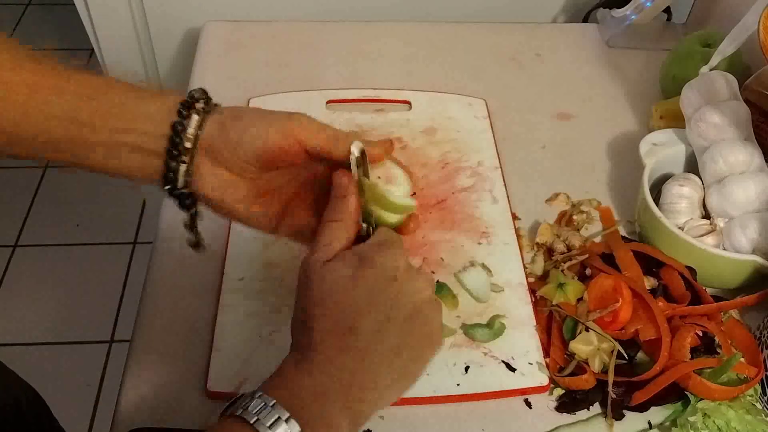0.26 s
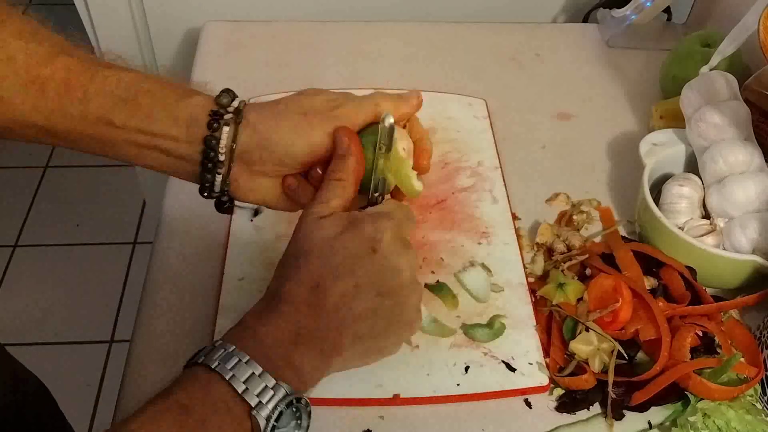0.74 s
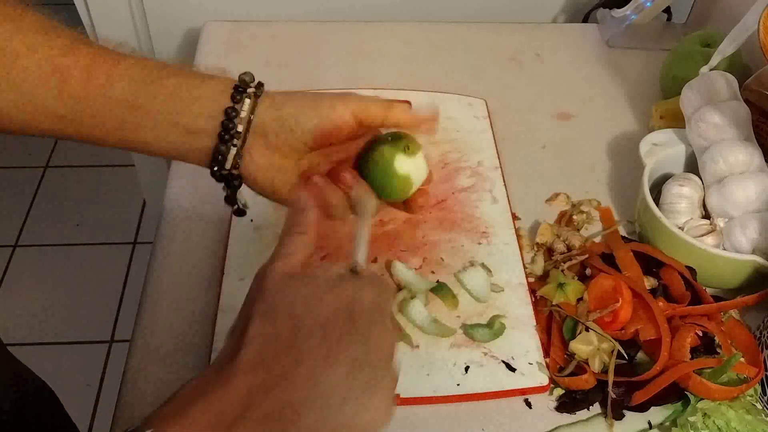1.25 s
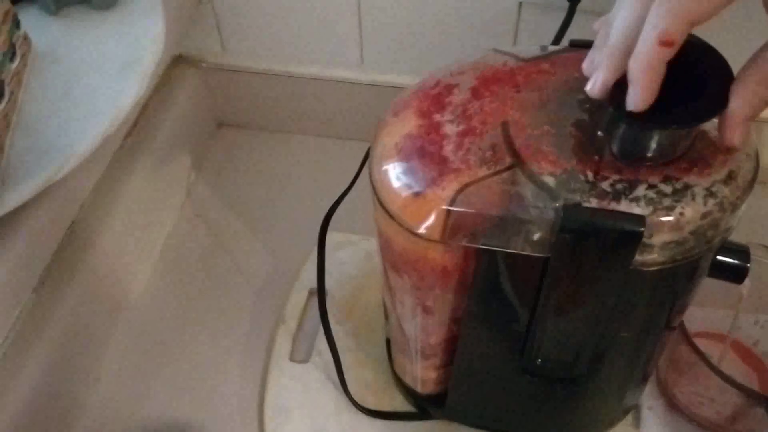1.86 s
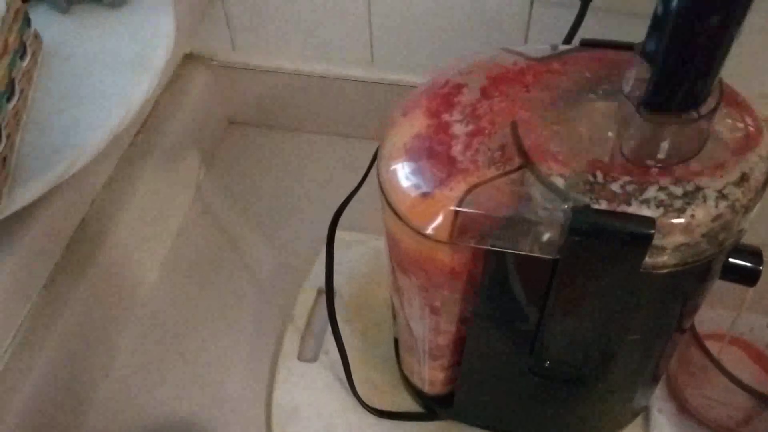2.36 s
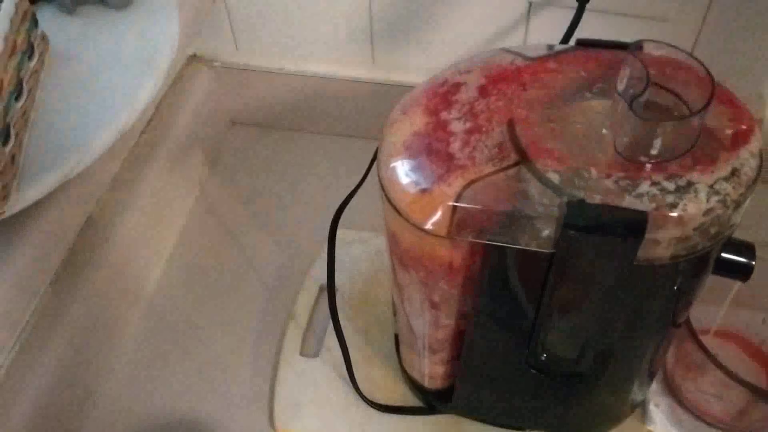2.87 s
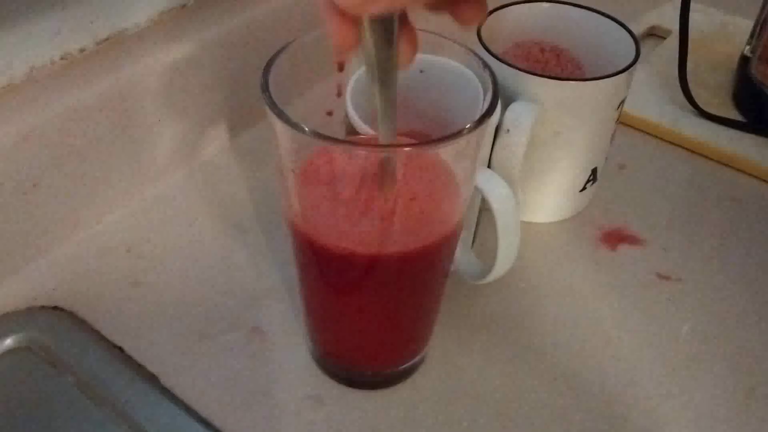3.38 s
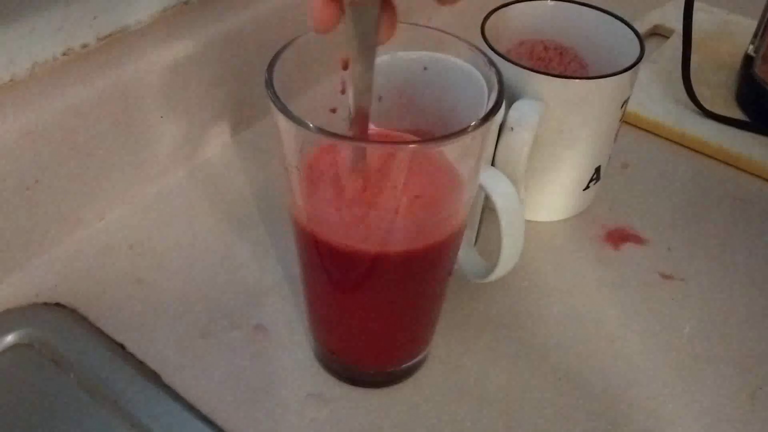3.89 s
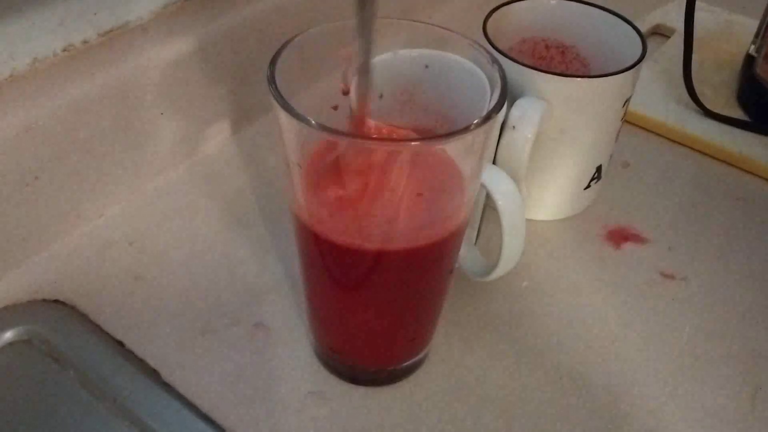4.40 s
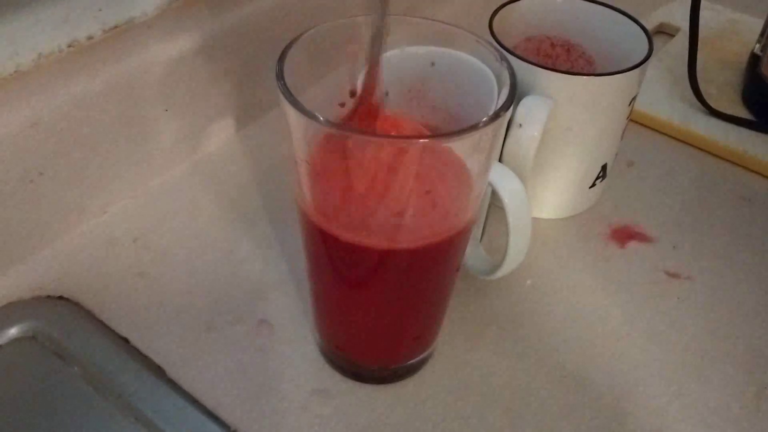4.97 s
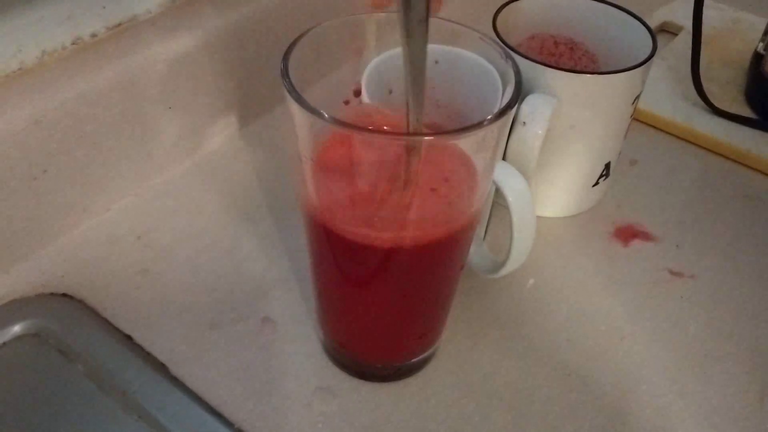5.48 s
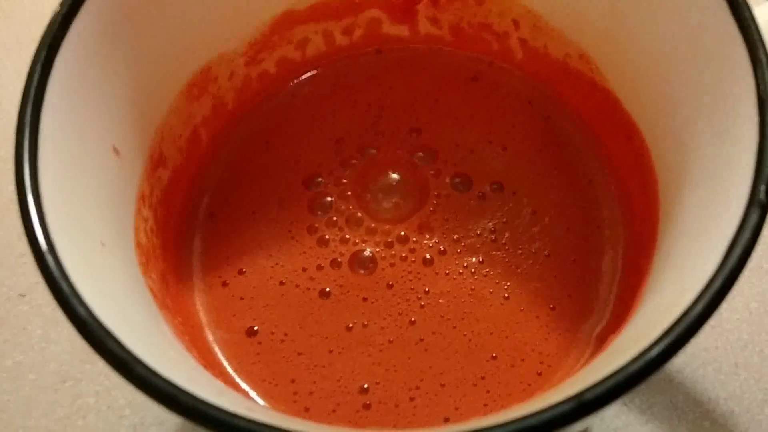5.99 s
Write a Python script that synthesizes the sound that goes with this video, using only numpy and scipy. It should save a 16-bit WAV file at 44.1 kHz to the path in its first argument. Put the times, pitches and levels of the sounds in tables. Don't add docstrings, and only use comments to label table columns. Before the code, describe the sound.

Harsh juicer motor drone with grinding and a sagging pitch, a second close run rising slightly, abrupt mute gap, then spoon clinks against glass.

```python
import sys
import numpy as np
from scipy import signal
from scipy.fft import rfft, irfft, next_fast_len
from scipy.io import wavfile
from scipy.ndimage import uniform_filter1d

SR = 44100
rng = np.random.default_rng(int(sys.argv[2]) if len(sys.argv) > 2 else 0)


def transcribe(u):
    v = np.clip(np.atleast_2d(u).T, -1, 1)
    q = np.round(v * 32767).astype(np.int16)
    wavfile.write(sys.argv[1], SR, q)


def to_linear_factor(level_db):
    exponent = np.asarray(level_db, float) / 20
    return 10 ** exponent


N = 275360

# time_s, shaft_hz, fruit_load (0-1), fan_whistle_db, commutator_whine_db
SPIN = [
    [(0.0, 211, .05, -2, -3), (0.2, 211.5, 0, -1, 3), (0.285, 213, .1, 8, 1), (0.392, 213.6, .15, 7, 3)],
    [(0.392, 211, .2, 12, -2), (0.47, 210.6, .33, 2, 5.5), (0.63, 209.8, .35, 1, 1),
     (0.78, 208.5, -.05, -3, 5), (0.96, 204.6, -.15, 5, 3), (1.07, 196.3, .05, 9, -6),
     (1.105, 192.7, 1.03, 1, -7), (1.126, 190, 1.03, 0, -8), (1.236, 177.4, .97, -5, -11),
     (1.326, 168, .93, -7, -14), (1.426, 161.8, .8, 0, -16), (1.486, 157, .7, 4, -18)],
    [(1.487, 197.2, .33, -2, -3.5), (1.707, 203.7, .02, 5.5, 1), (1.927, 208.1, .08, 7, -2.5),
     (2.368, 212.7, 0, 3, 2.5), (2.7, 214.4, 0, -1.5, 6.5), (3.02, 215.4, .08, 1, 0),
     (3.14, 213.9, -.1, -2, 8), (3.2472, 213, -.25, -3, 5)],
]
# shaft_multiple, level_db, sideband_above_db, sideband_below_db, left_minus_right_db
IDLE_ORDERS = [(1, -28, -9, -20.5, 14), (2, -38, -5, -16, 7.5), (3, -35, -6, -0.5, -3),
               (4, -29.5, -7.5, -13, -15), (5, -27, -18.5, -32.5, 2), (6, -31, -20.5, -7.5, 1),
               (7, -41, -10, -13.5, -2), (9, -37, -12, -9.5, 5), (11, -31.5, -11, -15, -18),
               (12, -24, -5, -17, 3), (24, -36, -17, -13, -5.5)]
GRATE_ORDERS = [(1, -30, -13, -31, 8.5), (2, -36, -17, -21, 13), (3, -37.5, -1, -2.5, -3.5),
                (4, -36.5, -11, -16, 2.5), (5, -35, -6, -12, -1.5), (6, -34.5, -11, -1.5, 1),
                (7, -54.5, -12, -13.5, 2), (9, -40.5, -15.5, -14, 2), (11, -41.5, -12, -14, 5.5),
                (12, -27, -3.5, -18.5, 0.5), (24, -33, -14, -13, -1.5), (35, -40.5, -12.5, -12.5, 5.5),
                (34, -41, -13, -10.5, 1)]
CLOSE_ORDERS = [(1, -14, -13.5, -33, 1.5), (2, -27, -10.5, -11, 9), (3, -32, -16, -14, 0.5),
                (4, -34, -7, -6.5, 0.5), (5, -29, -11.5, -12.5, -4), (6, -34, -18.5, -1.5, -5),
                (7, -38.5, -11.5, -15, -5), (9, -39, -12, -13.5, -4), (11, -33, -13, -13.5, -7),
                (12, -23, -8.5, -12.5, 5), (24, -33, -10, -10, 3.5)]
ORDERS = [IDLE_ORDERS, GRATE_ORDERS, CLOSE_ORDERS]
# freq_hz, density_db_per_hz
AIR = [
    [(45, -67), (150, -61.5), (280, -56.5), (500, -55), (900, -57), (1400, -56), (1900, -60.5),
     (2500, -57.5), (3300, -63.5), (5000, -66), (8200, -69), (9500, -65.5), (12000, -74), (15500, -71)],
    [(45, -61.5), (150, -61), (280, -55), (500, -55.5), (900, -56.5), (1400, -61), (1900, -61.5),
     (2500, -61), (3300, -63.5), (5000, -66), (8200, -64.5), (9500, -61), (12000, -67.5), (15500, -66)],
    [(45, -80), (150, -50.5), (280, -51), (500, -58), (900, -55.5), (1400, -57), (1900, -58), (2500, -55.5),
     (3300, -60.5), (5000, -64.5), (8200, -64.5), (9500, -63), (12000, -71), (15500, -67)],
]
# pull_rate_db, double_rate_db
HUM = [
    (-38.5, -31),
    (-39.5, -31),
    (-45, -35),
]
# rumble_db, air_rush_db, grater_db
CALM = [
    (-1, 0, .5),
    (-2.5, -1.5, -5.5),
    (-7, 1.2, .2),
]
# centre_s, length_s, unbalance_db, wobble_db, whine_db
SNAG = [(.2, .05, 0, -2, -3), (.3, .05, 4, 0, 0), (.35, .03, 0, 0, -7), (.46, .06, 4, 0, 4),
        (.74, .04, 2, -2, 2), (.86, .05, -2, 0, -5), (1.065, .035, -11, -3, -4), (1.13, .03, -4, 2, 0),
        (1.22, .02, 0, -3, 0), (1.26, .05, 3, 0, -2), (1.4, .04, 0, 2, 0), (1.47, .03, 0, -7, 0),
        (1.62, .07, -1, -4, 0), (2.2, .05, 0, 0, -1), (2.53, .035, 0, 0, -6), (2.85, .08, 0, 0, 3),
        (3.07, .03, -3, 0, 3), (3.1, .03, -4, -1, 2), (3.16, .04, -2, -2, 1.5)]
# centre_s, length_s, level_db
RESEAT = [
    (1.75, .35, -5),
    (2.95, .17, -10),
]
# centre_s, length_s, counter_rumble_db, grater_and_air_db
JOLT = [(.395, .02, 5, 6), (.45, .06, 9, 2), (.7, .025, 0, 3), (1.0, .1, 6, 0), (1.065, .025, -12, 0),
        (1.2, .06, 13, -1.5), (1.39, .08, 3, 1.5), (1.484, .025, 24, 0), (2.13, .04, 10, 1),
        (2.467, .03, 18, 2), (2.785, .05, 9, 1), (2.995, .04, 11, 0), (3.11, .04, 13, 1)]
# start_s, pitch_hz, level_db, t60_s
KNOCK = [(0.396, 1177, -12.5, 0.082), (.406, 1220, -8.5, 0.087), (.435, 1110, -11, .05),
         (.47, 1200, -17, .06), (.5, 1130, -16, .05), (1.02, 1000, -15, 0.09), (1.39, 1345, -19, 0.12),
         (1.55, 1002, -18, 0.13), (2.19, 960, -16, .08), (2.462, 45, -27, .06), (3.095, 1300, -11, 0.067),
         (3.09, 700, -15, 0.053)]
# centre_s, pitch_hz, level_db, length_s
SQUEAL = [(.39, 4680, -32, .025), (.42, 9600, -36, .04), (.92, 9700, -32, .03), (.98, 6950, -33, .04),
          (1.03, 8900, -30, .025), (1.1, 9350, -31, .04), (1.17, 9100, -31, .04), (1.22, 4300, -34, .04),
          (1.25, 10200, -33, .03), (1.32, 9500, -31, .04), (1.41, 9600, -31, .025)]

# freq_hz, left_right_correlation
LIKENESS = [(30, 1), (300, 0.8), (640, 0.17), (1400, 0.15), (3100, 0.088), (7000, .01)]
# freq_hz, left_minus_right_db
TILT = [(60, 0), (110, -1), (200, -3), (380, 2.5), (700, 0.5), (1290, -1), (2380, -0.5), (4400, 5.5),
        (8120, -6), (15000, -3)]

# start_s, peak_db, then relative wall_db, rim_db, bright_db
CLINK = [(3.8936, -33, -13, -25, -29), (3.9031, -19, -8, -26, -33), (3.9412, -31, 2, -20, -25),
         (4.018, -9.5, -8, -11, -37), (4.0794, -11.5, -4, -15, -33), (4.3019, -23, -2, -20, -34),
         (4.3908, -14.5, -3, -5, -22), (4.4712, -13, -3.5, -10, -17), (4.7681, -14, -11, -10, -11),
         (4.8102, -13.5, -10, -8, -9), (4.9172, -25, -12.5, -7, -22), (4.9919, -20.5, -23.5, -19, -26),
         (5.0697, -36, -21, -23, -29), (5.2526, -10.5, -20, -10, -14), (5.3335, -18, -6, -22, -36),
         (5.5454, -12.5, -3, -10, -17), (5.5972, -24, -1, -17, -35), (5.66, -18, -2, -28, -38),
         (5.7217, -27.5, -5, -17, -30), (5.7708, -14, -11, -18, -33), (5.8368, -12.5, -5, -12, -21),
         (5.9348, -29, 3, -15, -35), (5.9953, -32, -3, -17, -30), (6.0066, -35, -6, -18, -30)]
# deep_wall_db, main_wall_db, lowest_spoon_db
TOUCH = [(3, -4, 0), (4, -4, 0), (4, -5, 2), (3, -6, -7), (1, -2, -4), (-4, -2, 0), (-3, 1, -1),
         (-6, -2, 2), (3, -6, 3), (-1, 0, -6), (1, 5, -3), (-3, 0, 8), (1, -1, 2), (0, -5, -4), (-5, -3, 4),
         (1, 0, -1), (0, 1, -9), (2, -8, 9), (6, 2, 0), (6, 1, 7), (8, -2, -3), (-2, 0, -1), (7, -6, 7),
         (5, -6, 10)]
# crack_middle_db, crack_treble_db, top_tick_db
CONTACT = [(0, 3, 4), (0, 3, 5), (5, -1, 4), (-12, 0, -3), (2, 0, -4), (0, 1, 4), (0, -2, -8), (0, -2, -2),
           (0, 6, 5), (0, 0, 3), (-5, -4, 3), (3, 4, 2), (-2, -2, -9), (1, 3, 1), (-1, 4, 4), (-3, 0, -5),
           (0, -2, 9), (-3, 5, 5), (0, -3, -1), (2, 0, -2), (0, -3, -2), (0, 5, 6), (6, 1, -5), (6, 1, -2)]
# middle_wall_db, upper_wall_db, stem_db, tip_db, left_minus_right_db
GRIP = [(1, 0, -8, -4, -2), (1, 0, -9, -5, -2), (4, -1, -5, 2, -2), (0, 0, 2, 0, 0), (2, -3, 2, 0, -2),
        (7, 2, -5, 3, 0), (0, 0, 1, 1, 0), (-6, -2, 4, -8, 1), (-1, 1, -1, -4, 1), (1, 1, 0, -3, 5),
        (-3, -10, 0, 3, -1), (4, -2, -11, 0, 1), (0, -2, 0, -2, 0), (-1, 6, -3, -2, 2), (-4, 0, -4, 4, -1),
        (-8, -1, 0, -5, -1), (-1, -3, -7, 2, -1), (3, 1, -9, 3, -1), (1, -5, -3, -4, 0), (0, -4, 1, 3, 1),
        (4, -2, 6, -1, -1), (0, -2, -1, 0, -3), (-2, -3, 0, 6, -2), (-2, -2, 1, 6, -4)]
FREE = [.7, .6, .9, .8, .9, .5, .8, .9, .8, 1.3, .9, .6, .8, 1, .7, 1.05, 1.3, .5, .9, .8, 1, .8, .7, .7]
# pitch_hz, level_db, t60_s
WALL = [(611, -18, .07), (780, -17.5, 0.12), (1062, -2.5, 0.089), (1203, -7.5, 0.11), (1328, -3.5, 0.076),
        (1438, -7, 0.069), (1560, -11.5, 0.074)]
RIM = [(1856, -2.5, .08), (1910, -4.5, 0.044), (1957, -10, .19), (2100, -8, 0.034)]
BRIGHT = [(4212, -1, 0.04), (4226, -14, 0.24), (7344, -5, 0.065), (11180, -12, 0.073)]
SPOON = [(3076, 0.5, 0.038), (4800, -8, .03), (5307, 2.5, .04), (6140, 0, 0.023)]
# start_s, pitch_hz, level_db, t60_s
THUD = [(5.935, 250, -19, .07), (5.935, 335, -20, .08), (5.947, 300, -20, .05), (5.96, 270, -17, .04),
        (5.936, 1058, -15.5, .16), (5.934, 1290, -18, .04), (5.944, 1085, -22, .1), (5.96, 590, -33, .1),
        (5.977, 290, -25, .05), (5.995, 200, -23, .04), (6.002, 290, -22, .08), (6.001, 1210, -30, .07),
        (6.004, 2950, -38, .04), (3.905, 300, -29, .1), (3.905, 610, -38, .08)]
# freq_hz, density_db_per_hz
CRACK = [(200, -32.5), (900, -15.5), (2070, -11), (2530, -11.5), (3150, -9.5), (3700, -17), (4900, -3.5),
         (7300, -13.5), (8440, -23), (9800, -10.5), (11800, -10), (13000, -22.5), (15700, -28)]
# freq_hz, density_db_per_hz
SLOSH = [(40, -12), (120, 7.5), (300, -2), (600, -15), (1200, -37.5)]

# freq_hz, density_db_per_hz
STIR_HUSH = [(24, -44), (40, -15.5), (108, 4.5), (247, -3), (368, -9.5), (484, -10.5), (637, -14.5),
             (1220, -19), (1640, -26), (15500, -44.5)]
# freq_hz, density_db_per_hz
LAST_HUSH = [(40, -7), (183, -5.5), (310, -5.5), (505, -19.5), (592, -9), (900, -25), (2500, -41.5),
             (9000, -48), (10500, -58), (12000, -62), (15500, -52)]

STIR_S, LAST_S = 3.89, 6.0145
MAINS_HZ = 120
FREE_HZ = 215
JUDDER, CENTRE = .003, .9
UNBALANCE_DB, WOBBLE_DB, LOW_DB = 55, 22.5, 7
BEAT_DB, BEAT_SLIP, BEAT_LOAD_DB = 14, .035, -9
BARS_DB, RUSH_SLIP_DB = -50, -12
BOG_SLIP, BOG_DB, THIRD_DB = .175, -200, 2
RUSH_DB, GRATE_DB, BRAKE_S = 6, 9.5, .15
RATTLE_SHARE = .2
SQUEAL_WIDTH_HZ, SQUEAL_SAG = 520, .1
TICK_DB, TICK_SOFT, TICK_DULL, DULL_DB = -31, .4, .6, -27
SWIRL_HZ, SWIRL_SHARE = 35, .6
ROOM_T60_S, ROOM_DB = 0.2, -4.5
TOP_HZ = 15750


def curve(points, hz):
    p = np.array(points, float)
    return np.interp(np.log(hz + 1), np.log(p[:, 0] + 1), p[:, 1])


def walk(count, rate):
    k = int(SR / rate)
    held = np.repeat(rng.standard_normal(count // k + 1), k)
    return 1.377 * uniform_filter1d(uniform_filter1d(held, k), k)[:count]


def swells(t, events):
    return sum(np.outer(dbs, np.exp(-((t - at) / length) ** 2)) for at, length, *dbs in events)


def add(out, s, sound):
    i = int(s * SR)
    out[..., i:i + sound.shape[-1]] += sound[..., :N - i]


def tint(x, colour):
    cepstrum = irfft(np.log(to_linear_factor(curve(colour, np.arange(1025) * SR / 2048))))
    cepstrum[1:1024] *= 2
    cepstrum[1025:] = 0
    response = irfft(np.exp(rfft(cepstrum)))
    response = response / np.sqrt(np.sum(response ** 2))
    return signal.fftconvolve(x, response[None], axes=1)[:, :x.shape[1]]


def ring(hz, db, t60, push_s):
    t = np.arange(int(.35 * SR)) / SR
    decay = np.exp(-np.log(1000) * t / t60)
    return to_linear_factor(db) * np.sin(2 * np.pi * hz * t) * decay * (1 - np.exp(-t / push_s))


def hiss(count, colour, edges_hz, levels_db, flicker_db, rate):
    size = next_fast_len(count)
    hz = np.arange(size // 2 + 1) * SR / size
    like = np.clip(curve(LIKENESS, hz), 0, 1)
    tilt_db = curve(TILT, hz) / 2
    mid, side = rfft(rng.standard_normal((2, size))) * to_linear_factor(curve(colour, hz)) * np.sqrt(SR / 4)
    mid, side = mid * np.sqrt(1 + like), side * np.sqrt(1 - like)
    both = np.array([(mid + side) * to_linear_factor(tilt_db), (mid - side) * to_linear_factor(-tilt_db)])
    out = 0
    for octave in range(9):
        centre = 40 * 2. ** octave
        share = np.clip(1 - abs(np.log2(np.clip(hz, 40, 10240) / centre)), 0, 1)
        zone_db = levels_db[np.searchsorted(edges_hz, centre)] + flicker_db * walk(count, rate)
        out = out + irfft(both * share, size)[:, :count] * to_linear_factor(zone_db)
    return out


def kitchen(count, colour, db):
    noise = hiss(count, colour, (), (0,), flicker_db=.9, rate=12)
    return noise * to_linear_factor(db) / np.sqrt(np.mean(noise.mean(axis=0) ** 2))


def struck_modes(clink, touch_db, grip_db, free):
    _, peak_db, wall_db, rim_db, bright_db = clink
    out = 0
    groups = ((WALL, wall_db + 1.5, .022), (RIM, rim_db + 2.5, .008),
              (BRIGHT, bright_db + 6.5, .0015), (SPOON, -15, .03))
    for modes, rel_db, spread in groups:
        for hz, db, t60 in modes:
            off, size, left, right = rng.standard_normal(4)
            spot_db = np.dot(touch_db, (hz < 900, 900 < hz < 1130, 2900 < hz < 3300))
            held = (1130 < hz < 1260, 1260 < hz < 1650, 4500 < hz < 5600, 5600 < hz < 6500)
            spot_db += np.dot(grip_db, held)
            level_db = peak_db + rel_db + spot_db + db + 1.6 * size
            mode = ring(hz * (1 + spread * off), level_db, t60 * free, push_s=0.00086)
            throb = np.sin(np.pi * SWIRL_HZ * np.exp(left / 2) * np.arange(len(mode)) / SR) ** 2
            mode = mode * (1 + SWIRL_SHARE / 2 - SWIRL_SHARE * throb)
            out = out + mode * to_linear_factor(3.8 * np.array([[left], [right]]))
    return out


def contact_crack(t, contact_db, stem_db):
    mid_db, treble_db, _ = contact_db
    colour = []
    for hz, db in CRACK:
        meet_db = mid_db * (2200 < hz < 4000) + stem_db * (4500 < hz < 5600) / 2 + treble_db * (6500 < hz)
        colour.append((hz, db + meet_db + 3 * rng.standard_normal()))
    decay = np.exp(-t / 0.0043) + 0.37 * np.exp(-t / 0.0083)
    return tint(rng.standard_normal((2, len(t))) * decay * (1 - np.exp(-t / 0.00039)), colour)


def tiled_room(x):
    t = np.arange(int(.3 * SR)) / SR
    decay = np.exp(-np.log(1000) * t / ROOM_T60_S)
    wash = rng.standard_normal((2, len(t))) * decay * (1 - np.exp(-t / 0.0021))
    wash = wash / np.sqrt(np.sum(wash ** 2, axis=1, keepdims=True))
    return to_linear_factor(ROOM_DB) * signal.fftconvolve(x, wash, axes=1)[:, :N]


def glass():
    direct, ticks, slaps = np.zeros((3, 2, N))
    t = np.arange(int(.12 * SR)) / SR
    for clink, touch_db, contact_db, grip, free in zip(CLINK, TOUCH, CONTACT, GRIP, FREE):
        s, peak_db, _, _, bright_db = clink
        *grip_db, pan_db = grip
        side = to_linear_factor(pan_db / 2 * np.array([[1], [-1]]))
        add(direct, s, side * struck_modes(clink, touch_db, grip_db, free))
        add(direct, s, side * contact_crack(t, contact_db, grip_db[2]) * to_linear_factor(peak_db - 6.5))
        tick_db = contact_db[2] + TICK_DB - TICK_SOFT * peak_db - TICK_DULL * max(bright_db, DULL_DB)
        tick = rng.standard_normal((2, len(t))) * np.exp(-t / .004) * (1 - np.exp(-t / .0008))
        add(ticks, s, tick * to_linear_factor(peak_db + tick_db + 8.5))
        slap = rng.standard_normal(len(t)) * np.exp(-t / 0.027) * (1 - np.exp(-t / .008))
        add(slaps, s, slap * to_linear_factor(0.28 * peak_db - 31.5))
    for s, hz, db, t60 in THUD:
        add(direct, s, ring(hz, db, t60, push_s=0.00038))
    ticks = tint(ticks, [(11500, -36.5), (13500, 3.5), (14800, 1.5)])
    return direct + ticks + tiled_room(direct + .45 * ticks) + tint(slaps, SLOSH)


def grater():
    out = np.zeros((2, N))
    t = np.arange(-int(.1 * SR), int(.1 * SR)) / SR
    for s, hz, db, length in SQUEAL:
        parts = np.array([walk(len(t), rate=SQUEAL_WIDTH_HZ) for _ in range(4)])
        rough = parts[::2] + 1j * parts[1::2]
        tone = np.exp(2j * np.pi * hz * t * (1 - SQUEAL_SAG * t / 2))
        add(out, s + t[0], to_linear_factor(db + 2.5) * np.exp(-(t / length) ** 2) * (rough * tone).real)
    return out


def order_change_db(k, t, slip, load, fan_db, whine_db):
    unbalance_snag, wobble_snag, whine_snag = swells(t, SNAG)
    wobble_db = WOBBLE_DB * load + wobble_snag
    whine_snag = whine_db + whine_snag
    own_db = {1: UNBALANCE_DB * slip + unbalance_snag, 2: wobble_db, 5: fan_db, 12: whine_snag}
    low_mid_high_db = (LOW_DB * load, 0.45 * whine_db, BARS_DB * slip + swells(t, RESEAT)[0])
    change_db = own_db.get(k, low_mid_high_db[np.searchsorted((4, 20), k)])
    if k == 3:
        bogged_db = BOG_DB * np.maximum(slip - 1.2 * BOG_SLIP, 0)
        resonance_db = 7 * np.exp(-((slip - .2) / .015) ** 2)
        change_db = change_db + THIRD_DB * load + bogged_db + resonance_db
    if k == 4:
        change_db = change_db + .3 * np.maximum(wobble_db - 6, 0)
    if k in (4, 6):
        bogged_db = BOG_DB * np.maximum(slip - BOG_SLIP, 0)
        change_db = change_db + bogged_db + (k - 3) * 1.5 * np.maximum(load, 0) ** 2
    return change_db


def motor(spin, orders, hum_db):
    s, *columns = np.transpose(spin)
    t = np.arange(int(s[0] * SR), int(s[-1] * SR)) / SR
    hz, load, fan_db, whine_db = (np.interp(t, s, c) for c in columns)
    slip = np.maximum(1 - hz / FREE_HZ, 0)
    judder = (.0005 + JUDDER * np.maximum(load, 0) ** 2) * walk(len(t), rate=28)
    turn = 2 * np.pi * np.cumsum(hz * (1 + judder)) / SR
    pull = 2 * np.pi * MAINS_HZ * t
    beat_db = BEAT_DB * (np.minimum(slip / BEAT_SLIP, 1) - .5) + BEAT_LOAD_DB * load
    hum = sum(np.sqrt(2) * to_linear_factor(db) * np.sin((k + 1) * pull) for k, db in enumerate(hum_db))
    out = hum * np.ones((2, 1))
    for k, db, up_db, down_db, pan_db in orders:
        k = round(k)
        line_db = db + order_change_db(k, t, slip, load, fan_db, whine_db)
        pan = to_linear_factor(np.outer((pan_db, -pan_db), 1 - CENTRE * load * (k == 1)) / 2)
        pan = pan / np.sqrt(np.mean(pan ** 2, axis=0) / 2)
        for shift, rel_db in ((0, 0), (0.99, up_db + beat_db * (k > 10)), (-1, down_db)):
            apart = min(.13 * k, .7) * (-1) ** k + min(.04 * k, .15) * walk(len(t), rate=6)
            phase = rng.uniform(0, 2 * np.pi) + apart * np.array([[1], [-1]])
            waver_db = min(.6 * k, 1.4) * walk(len(t), rate=30)
            waver_db = waver_db + (k > 20) * (3 * walk(len(t), rate=14) - 3)
            if shift and k < 7:
                waver_db = waver_db - np.maximum(line_db - np.median(line_db), 0)
            out = out + pan * to_linear_factor(line_db + rel_db + waver_db) * np.sin(k * turn + shift * pull + phase)
    brake = -uniform_filter1d(np.gradient(hz) * SR, int(BRAKE_S * SR)) / 100
    return out, t, turn, pull, slip, brake


def juicer():
    out = np.zeros((2, N))
    for spin, orders, colour, hum_db, calm in zip(SPIN, ORDERS, AIR, HUM, CALM):
        lines, t, turn, pull, slip, brake = motor(spin, orders, hum_db)
        rumble, burst = swells(t, JOLT)
        rattle = RATTLE_SHARE * rumble + 2 * brake - 1
        rush = RUSH_SLIP_DB * slip + RUSH_DB * brake + .6 * burst
        grate = GRATE_DB * brake + burst
        zones_db = (calm[0] + rumble, rattle, calm[1] + rush, calm[2] + grate)
        noise = hiss(len(t), colour, (100, 1500, 7000), zones_db, flicker_db=1.24, rate=18)
        add(out, t[0], lines + noise * (1 + 0.05 * np.sin(turn) + .15 * np.sin(pull)))
    for s, hz, db, t60 in KNOCK:
        add(out, s, ring(hz, db, t60, push_s=.003))
    return out * (np.arange(N) < SPIN[-1][-1][0] * SR)


def scene():
    start, last = int(STIR_S * SR), int(LAST_S * SR)
    out = juicer()
    out[:, start:last] = glass()[:, start:last] + kitchen(last - start, STIR_HUSH, db=-45)
    whistle = to_linear_factor(-75) * np.sin(2 * np.pi * 4678 * np.arange(N - last) / SR)
    out[:, last:] = kitchen(N - last, LAST_HUSH, db=-44.5) + whistle
    tick = rng.standard_normal(40) * np.exp(-np.arange(40) / 6)
    add(out, 6.037, to_linear_factor(-52) * tick)
    return out + grater()


def low_pass(x):
    return signal.sosfilt(signal.butter(12, 16960, fs=SR, output="sos"), x)


def record(dry):
    soft = np.tanh(0.93 * dry) / 0.88
    top_cut = signal.ellip(10, .2, 60, TOP_HZ, fs=SR, output="sos")
    mix = signal.sosfilt(top_cut, soft)
    return low_pass(mix)


dry = scene()
out = record(dry)
transcribe(out)
```